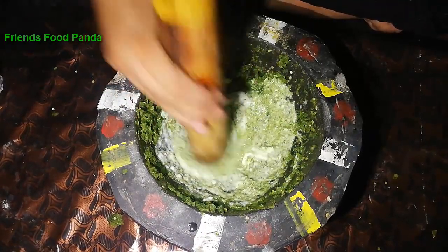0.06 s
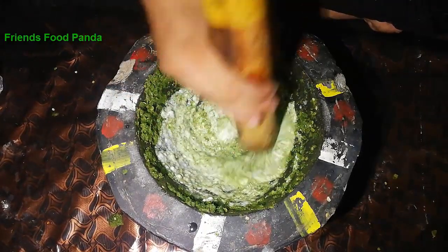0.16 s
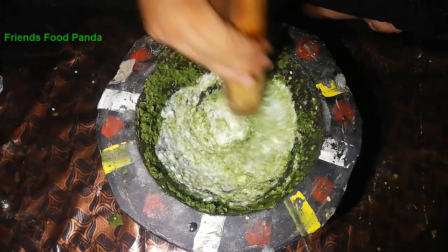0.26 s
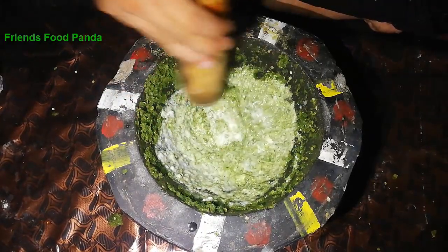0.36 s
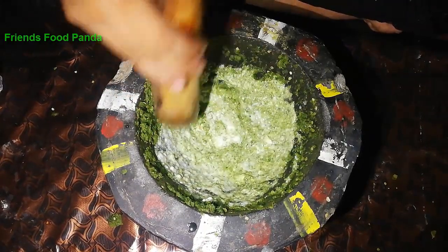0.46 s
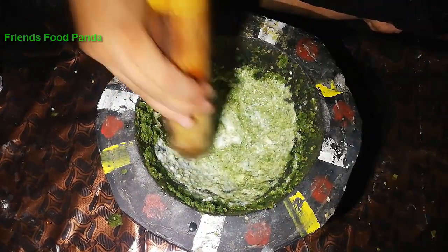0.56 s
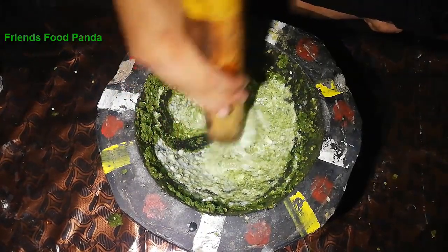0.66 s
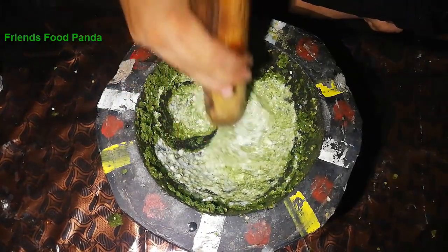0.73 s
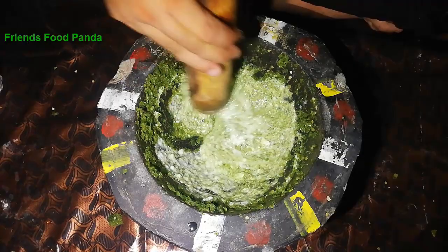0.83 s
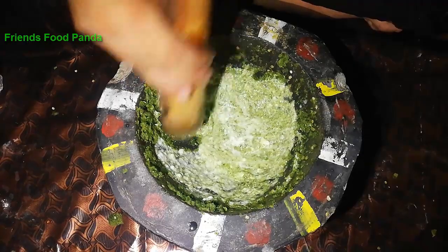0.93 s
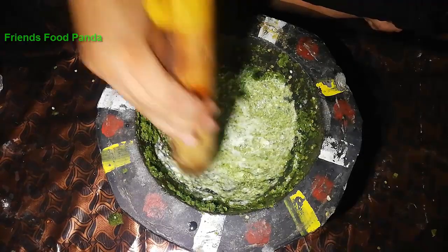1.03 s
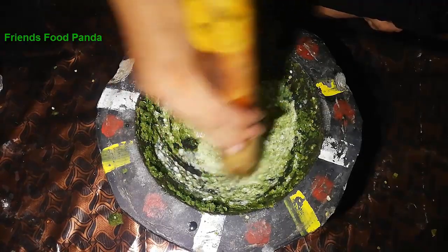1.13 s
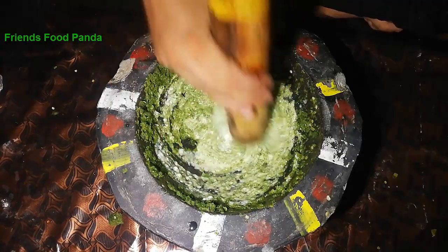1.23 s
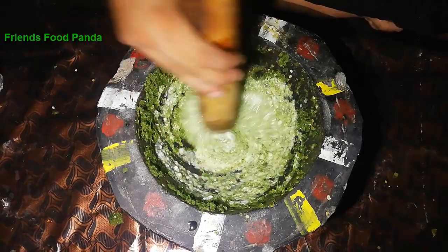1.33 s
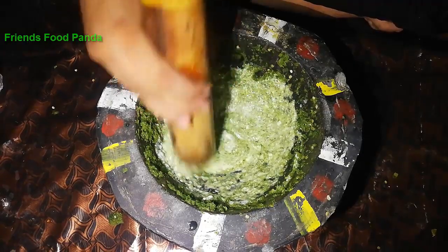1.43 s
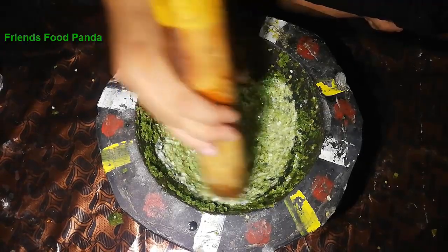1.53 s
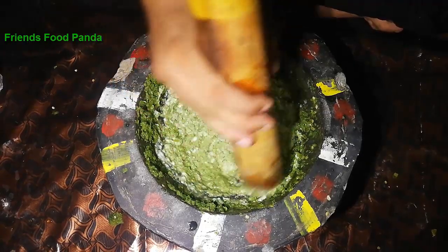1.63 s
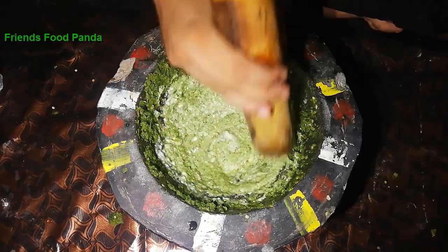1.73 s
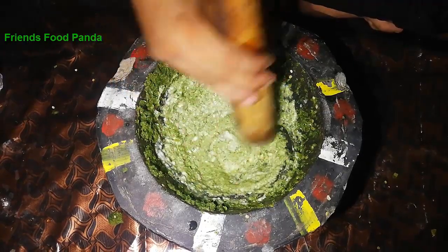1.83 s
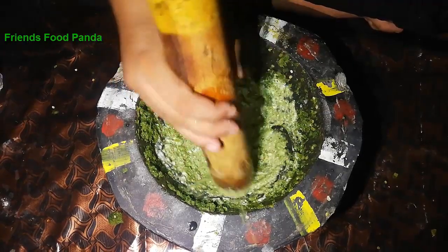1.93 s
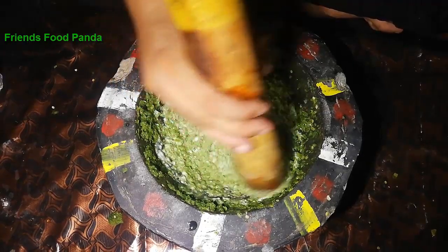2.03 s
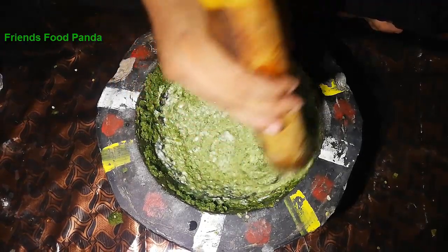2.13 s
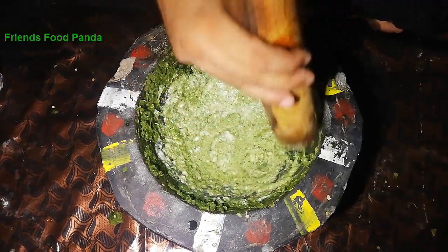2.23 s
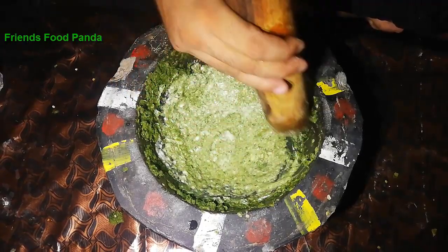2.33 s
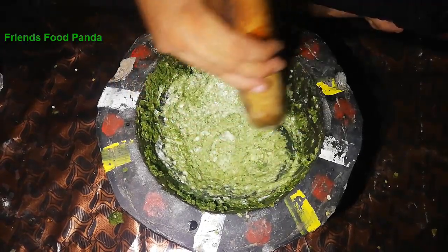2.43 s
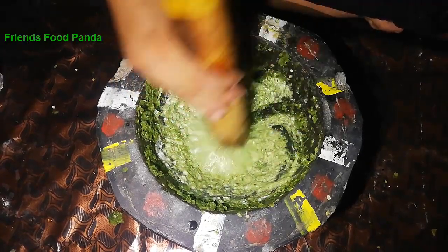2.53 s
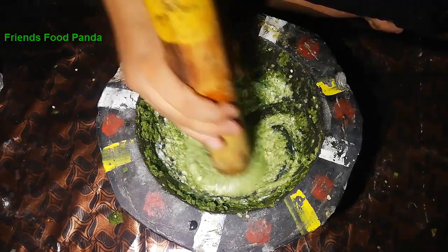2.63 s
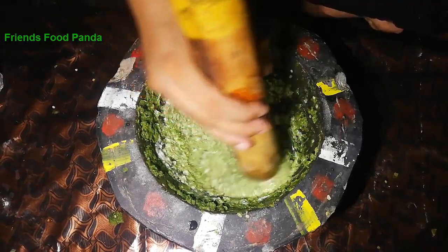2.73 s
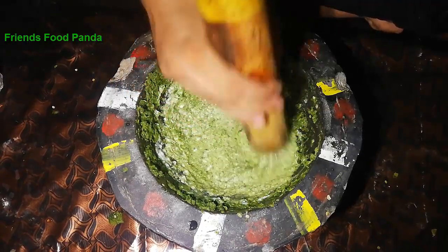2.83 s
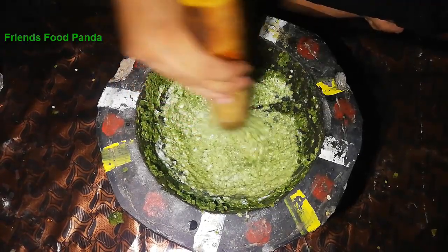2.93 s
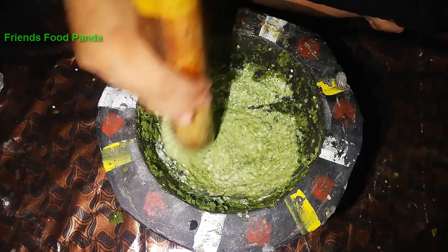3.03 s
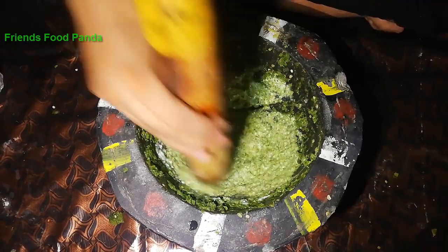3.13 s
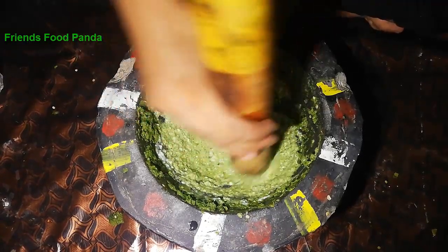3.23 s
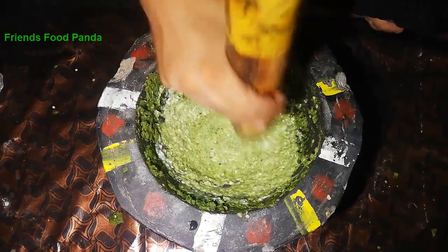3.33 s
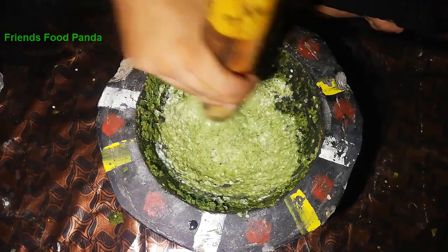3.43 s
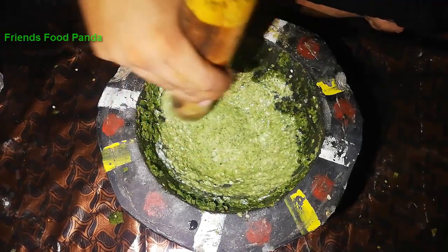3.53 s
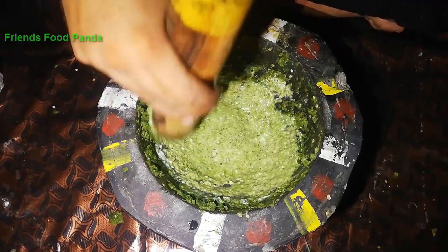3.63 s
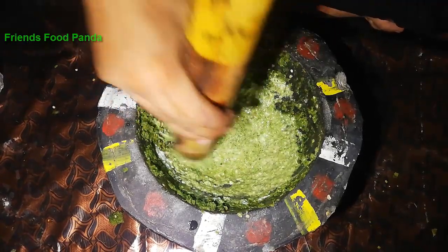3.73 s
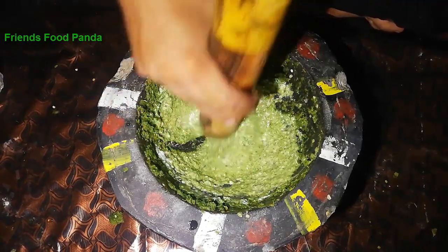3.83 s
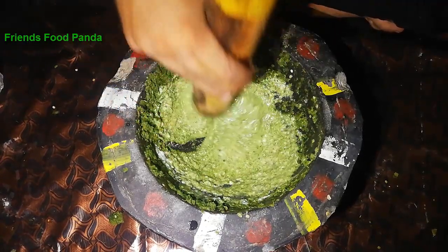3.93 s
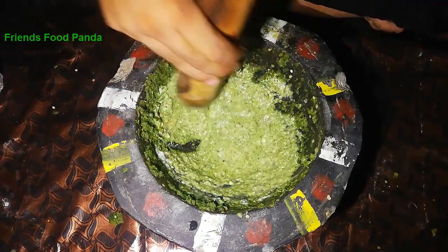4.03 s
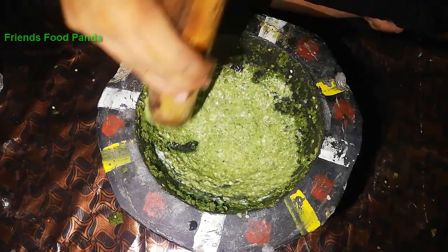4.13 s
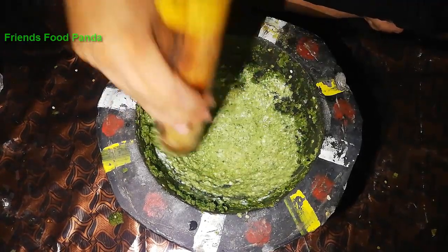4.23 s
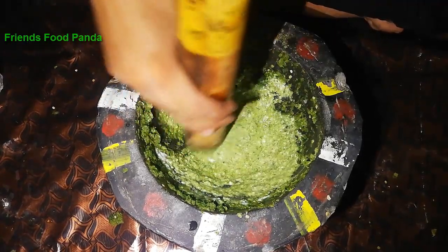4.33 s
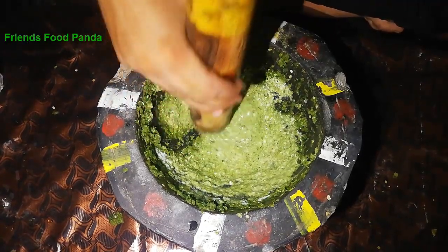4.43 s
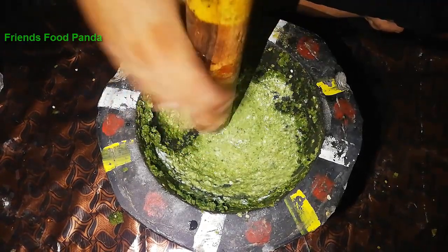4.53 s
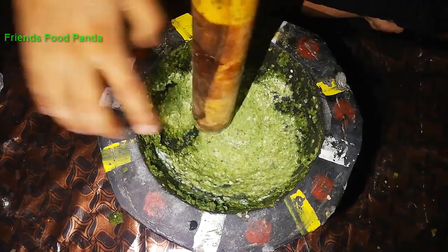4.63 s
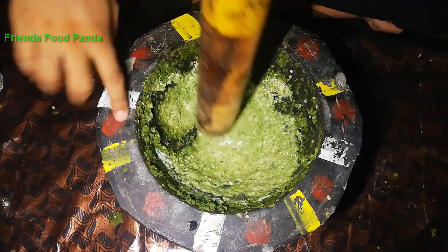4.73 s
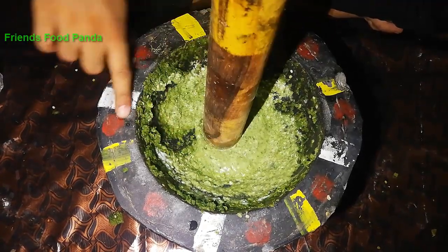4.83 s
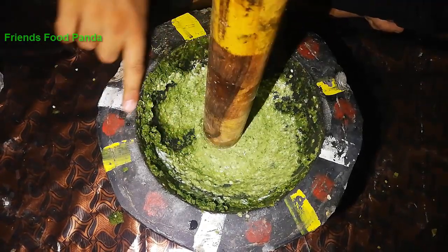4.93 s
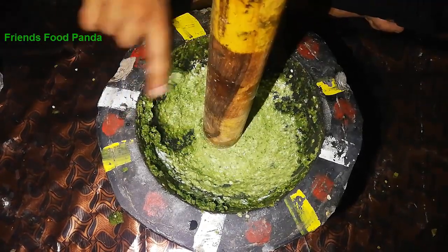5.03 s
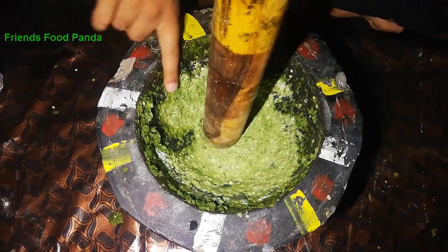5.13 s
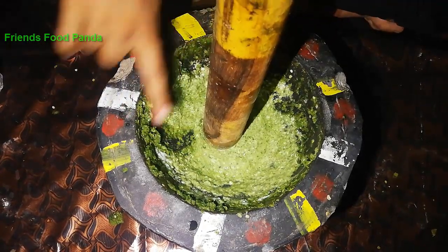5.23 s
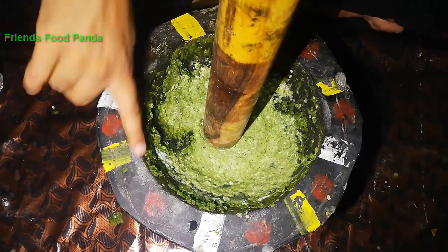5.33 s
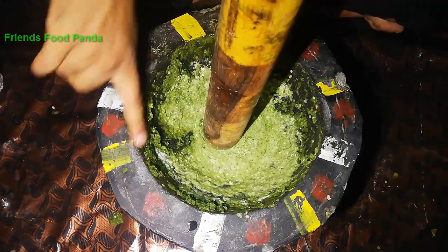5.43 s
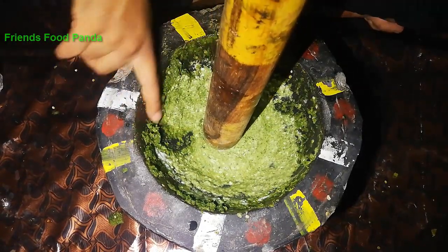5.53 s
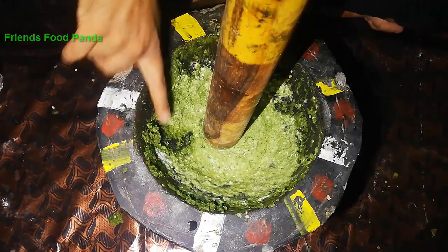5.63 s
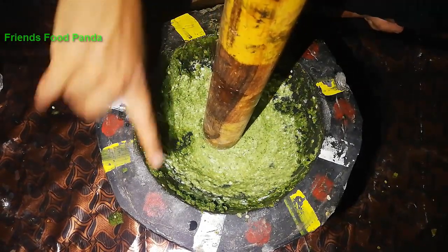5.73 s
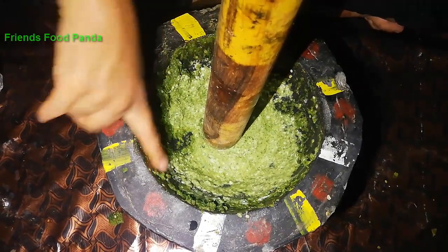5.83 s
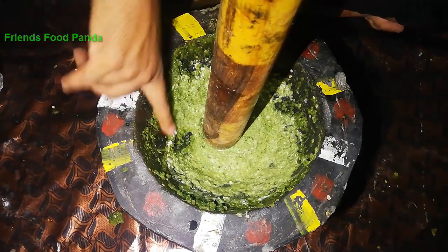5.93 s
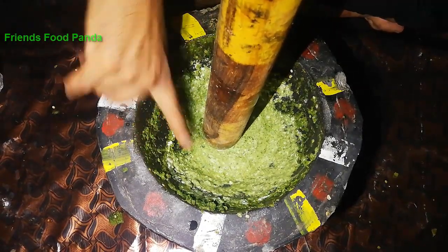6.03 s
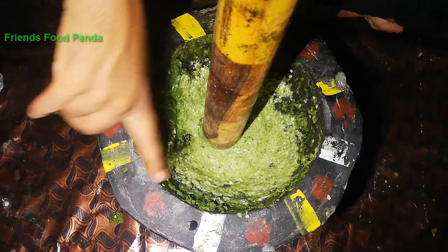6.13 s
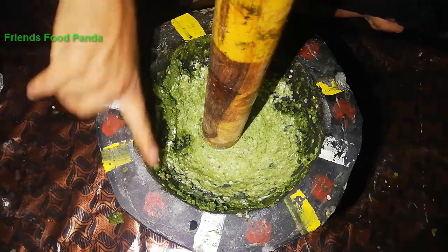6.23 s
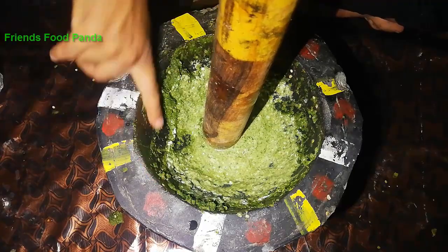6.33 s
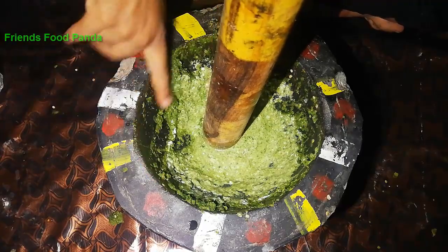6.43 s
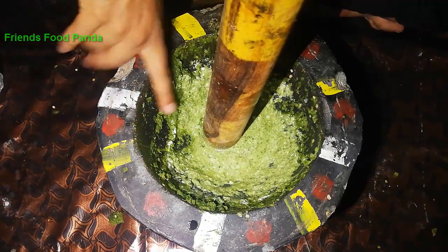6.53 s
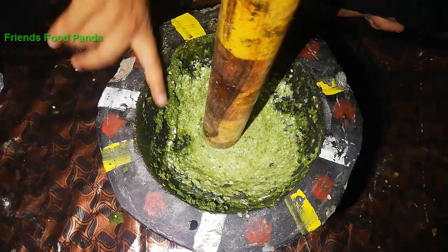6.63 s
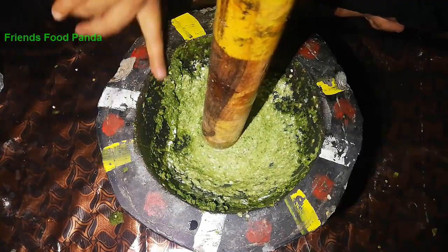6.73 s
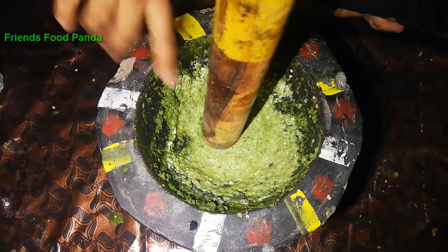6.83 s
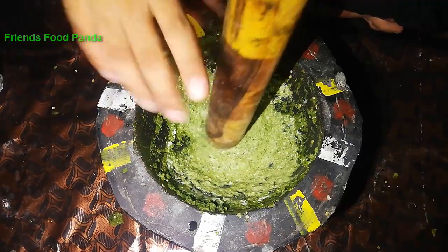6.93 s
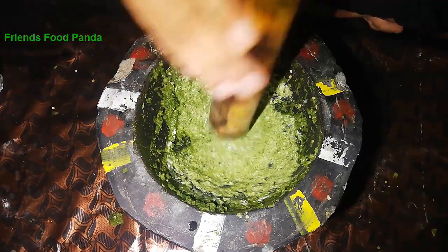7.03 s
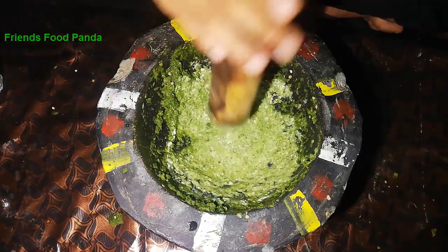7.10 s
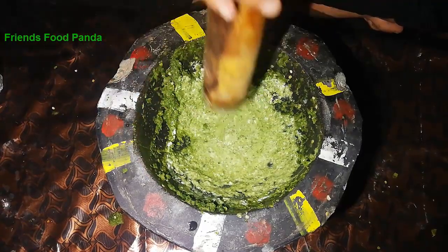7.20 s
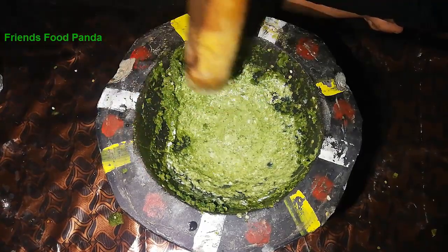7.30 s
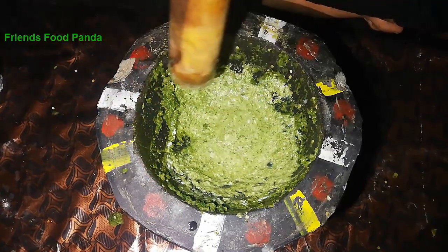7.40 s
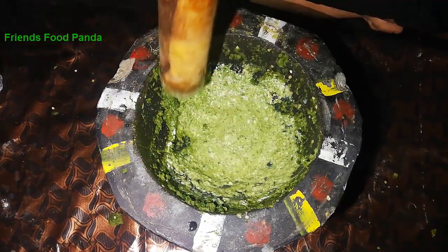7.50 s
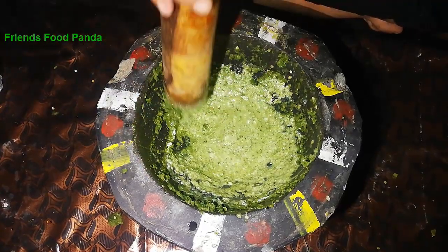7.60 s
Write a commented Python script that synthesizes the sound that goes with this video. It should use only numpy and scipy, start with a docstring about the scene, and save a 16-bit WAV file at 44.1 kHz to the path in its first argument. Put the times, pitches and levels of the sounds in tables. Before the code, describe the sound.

Fast, uneven grinding strokes swing around a heavy bowl, woody and stony, with moist clicks and dull thuds as the pestle hits the wall. After nearly five seconds it falls quiet, leaving small wet smacks and soft rubbing from a finger, then one modest knock. Close stereo microphone, brighter on the right, with short indoor reverberation and faint low rumble.

```python
"""Pestle and mortar on a kitchen floor

A wooden pestle grinds wet herb paste round a heavy mortar and now and then knocks the wall; then a finger
wipes the paste down from the rim in short strokes, and the pestle is set down once more.
Random slips drive the resonances of mortar, bowl, wall and pestle; jolts add pulses, echoes and ringing.
Sheared paste is grainy noise that clicks and bursts where it lets go. A low rumble, a faint whirr and
reverberation fill the room; the right microphone port is brighter and rings near 10 kHz."""
import sys
import numpy as np
from scipy import signal
from scipy.io import wavfile
from scipy.ndimage import uniform_filter1d, map_coordinates

SR = 44100
rng = np.random.default_rng(int(sys.argv[2]) if len(sys.argv) > 2 else 0)


def master(y):
    """Save y as 16-bit WAV."""
    cut = np.clip(np.atleast_2d(y).T, -1, 1)
    pcm = np.round(cut * 32767)  # scale
    wavfile.write(sys.argv[1], SR, pcm.astype(np.int16))


def undo_db(level):
    """Turn decibels back into plain size, where 20 dB means ten times bigger."""
    steps = np.asarray(level, float) / 20
    return 10 ** steps


N = 337806

# Steady room noise. Each row: frequency in Hz, relative density in dB per Hz.
ROOM_SPECTRUM = [(30, -22), (110, -10.5), (190, -8.5), (364, -10), (589, -17.5), (646, -13.5), (683, -12),
                 (1050, -14.5), (3370, -18.5), (14600, -27.5), (16000, -44)]
# Its stereo balance. Each row: frequency in Hz, left minus right in dB.
ROOM_BALANCE = [(60, 0), (300, 0), (1300, 0), (2400, -3), (8000, -2), (15000, 0)]
# Its stereo likeness. Each row: frequency in Hz, left-right correlation from -1 to 1.
ROOM_LIKENESS = [(60, .99), (130, .97), (290, .5), (640, .1), (15000, 0)]
ROOM_DB = -72
# A faint steady whirr far off. Each row: frequency in Hz, width of each of two resonators in Hz, level in dB.
WHIRR = [(6530, 300, -84)]

# Distant rumble. Each row: time in seconds, level in dB.
RUMBLE_LEVEL = [(0.0, -54.5), (1.23, -59), (1.54, -67.5), (2.62, -57), (2.92, -63), (3.127, -53),
                (4.2, -62.5), (4.59, -56.5), (5.29, -63.5), (5.72, -59), (6.31, -62), (7.66, -63.5)]
# Resonances where the room booms. Each row: frequency in Hz, width in Hz, relative level in dB.
RUMBLE_MODES = [(81.7, 26, -1), (125.6, 19, 0.5)]
DRONE_HZ, DRONE_WIDTH_HZ, DRONE_DB = 24, 10, -73   # a steady deep drone

# Mortar rocking on the floor. Each row: frequency in Hz, width in Hz, relative left and right levels in dB.
ROCKING_MODES = [(114, 37, -2.5, -1), (191, 36, 3, 4), (262, 28, 10, 6.5), (382, 24, -6, 2),
                 (393, 14.4, -3.5, -5.5), (467, 16, 4, -9), (515, 70, -8, -4), (620, 100, -4, -0.5),
                 (633, 131, -1, -5), (720, 92, -16.5, -18)]
# Bowl. Each row: frequency in Hz, width in Hz, relative left and right levels in dB.
BOWL_MODES = [(1040, 40, -12.5, -18), (1097, 182, -1, -8), (1136, 28, -0.5, 2.5), (1264, 83, 8.5, 8),
              (1323, 36, 4, -5), (1360, 590, -11, -6)]
# Pestle, ringing lengthwise about 1130 Hz apart.
# Each row: frequency in Hz, width in Hz, relative left and right levels in dB.
PESTLE_MODES = [(2208, 98, -10.5, 0.5), (2242, 43, -6.5, 2), (2332, 25, -7, -2.5),
                (2560, 780, -23.5, -20.5), (3348, 53, -5, 1.5), (3407, 250, -25, -5.5),
                (3736, 200, -32.5, -14), (4640, 120, -12, -7.5), (4420, 65, -19, -13),
                (5880, 29, -16.5, -13), (7050, 34, -25, -10)]
# Thin rings of the mortar wall. Each row: frequency in Hz, width in Hz, relative left and right levels in dB.
WALL_MODES = [(1554, 15, -4, 4.5), (3170, 32, -8, -1.5), (5660, 11, -13.5, -15.5)]
RIM_HZ = 2400   # the upper wall rings lie above
# Wet wood squeaking on stone. Each row: frequency in Hz, width in Hz, relative left and right levels in dB.
SQUEAK_MODES = [(2434, 66, -11, 0.5), (2450, 79, -24, -14.5)]
# The bowl's note moves with the contact point. Each row: time in seconds, contact pitch in Hz.
BOWL_PITCH = [(0.0, 1224), (0.34, 1266), (0.38, 1206), (0.56, 1293), (0.84, 1179), (1.23, 1328),
              (1.34, 1210), (1.41, 1279), (1.58, 1172), (1.91, 1318), (1.93, 1109), (2.18, 1306),
              (2.52, 1225), (2.93, 1273), (2.98, 1180), (3.11, 1295), (3.34, 1294), (3.46, 1179),
              (3.57, 1267), (3.79, 1271), (3.88, 1365), (3.97, 1249), (4.46, 1306), (4.6, 1199)]
BOWL_FOLLOWS = .6      # exponent: share of that move, in octaves, that the bowl makes
PESTLE_WANDER = .012   # relative pitch wander of the pestle under grip and load
WANDER_DB = 2.5        # spread by which each rubbed mode swells and fades

# Sweeps of the pestle round the bowl. Each row: peak in seconds, fall in seconds, pestle singing in dB,
# bowl scrape over it in dB, weight on the floor over it in dB.
SWEEPS = [(0.01, 0.076, -50.5, 5, 9), (0.207, 0.63, -57, -5.5, 6), (0.357, 0.39, -66, 17, -13.5),
          (0.44, 0.38, -66.5, -25, -2), (0.736, 0.068, -52, 7.5, 11.5), (0.816, 0.12, -58.5, 15.5, -7),
          (1.006, 0.22, -62, 3.5, 5), (1.119, 0.1, -56, 3.5, 4.5), (1.225, 0.08, -50, -1, 4.5),
          (1.405, 0.78, -70.5, 16.5, 20.5), (1.553, 0.2, -52, -20, -30.9), (1.611, 0.045, -57, -2, 15.5),
          (1.804, 0.099, -57.5, -2.5, 9.5), (2.02, 0.048, -60, 8, 25.5), (2.07, 0.06, -61.5, 6, 15),
          (2.129, 0.11, -54.5, -7.5, -3), (2.24, 0.26, -57.5, -3.5, -10), (2.46, 0.26, -61, -2, -12),
          (2.591, 0.13, -56, 2, 2.1), (2.75, 0.077, -55, 3.5, -6.5), (2.97, 0.19, -51, 4.5, 8),
          (3.12, 0.11, -52.5, -11, 1.5), (3.24, 0.22, -50, 3.5, 2.5), (3.31, 0.73, -65.5, 7.5, 12),
          (3.454, 0.11, -51, 6, 5.5), (3.619, 0.22, -56.5, -31, -18), (3.682, 0.078, -53.5, -4.5, -37),
          (3.844, 0.21, -55.5, -1.5, 3), (3.893, 0.053, -49.5, 8, -3), (3.93, 0.04, -55.5, 5.5, -4),
          (3.97, 0.071, -50.5, 2.5, -22), (4.03, 0.019, -59.5, 5, -18), (4.157, 0.072, -66, -0.5, -13),
          (4.341, 1, -62.5, -4, -4.5), (4.421, 0.058, -54.5, 1.5, -0.5), (4.465, 0.061, -55, 7.5, -3.5),
          (4.51, 0.049, -57, 4, -7), (4.61, 0.03, -57.5, 1, -17), (4.845, 0.044, -62, -3.5, -4.5),
          (4.89, 0.028, -54, -4.5, -2), (6.74, 0.1, -68.5, -22, -26), (7.575, 0.046, -72, 14.5, 18.5),
          (7.62, 0.08, -76.5, 8, 17)]
SWEEP_RISE_SHARE = 0.39   # a sweep rises in this share of its fall time
# What each sweep also sets going, in dB over its pestle level (the boom: over its weight).
SWEEP_HISS_DB, SWEEP_WALL_DB, SWEEP_SQUEAK_DB, SWEEP_BOOM_DB = -19.5, -17.5, -19.5, -11
# The pestle is off the stone. Each row: start in seconds, end in seconds.
LIFTS = [(1.871, 1.99), (4.54, 4.82), (4.93, 6.6)]
LIFT_DB, LIFT_S = -14, 0.0091   # drop of the rubbing, and the time it takes
SWELL_DB, SWELL_BEND = 12, 1.4   # a swell is SWELL_DB down after its rise or fall time; roundness of its top
# Near this load in dB the judder moves to the rocking modes above SHUDDER_HZ, which gain SHUDDER_GAIN_DB.
SHUDDER_DB, SHUDDER_HZ, SHUDDER_GAIN_DB = -38, 415, 9.5
# Grit or a finger rubbing straight on the wall. Each row: peak in seconds, rise in seconds, fall in seconds,
# level in dB, upper rings over it in dB.
WALL_RUBS = [(0.0, 0.026, 0.068, -71, 3), (0.43, 0.049, 0.026, -51, 4.5), (0.82, 0.062, .06, -71, 6),
             (1.65, 0.084, 0.031, -54, 2), (1.832, 0.11, 0.019, -63, 7), (2.02, 0.015, 0.035, -40.5, -6),
             (2.25, 0.18, 0.2, -60.5, 4.5), (2.735, 0.014, .06, -65, 12), (3.02, 0.074, 0.057, -54, -5),
             (3.91, 0.037, 0.11, -58, 2.5), (4.44, 0.15, 0.047, -60, 1.5), (5.57, 0.051, 0.065, -76, 4),
             (5.98, 0.04, 0.045, -73, 3), (6.345, 0.069, 0.05, -77.5, 13), (6.43, 0.04, 0.04, -87, 10),
             (6.5, 0.04, 0.04, -83.5, 13), (7.57, 0.014, 0.13, -67.5, 2)]
# Wet wood squeaking. Each row: peak in seconds, rise in seconds, fall in seconds, level in dB.
SQUEAKS = [(0.49, 0.061, 0.083, -51), (0.88, 0.091, 0.26, -63), (1.226, 0.011, 0.065, -53),
           (3.0, 0.15, 0.2, -52), (3.36, .12, 0.11, -55), (3.489, 0.09, 0.11, -45),
           (3.68, 0.025, 0.017, -54), (3.9, 0.18, 0.18, -54), (4.19, 0.11, 0.027, -69),
           (4.45, 0.022, 0.079, -49), (4.88, .05, 0.038, -64)]
# Strokes that bring out the pestle's third ring near 3.4 kHz.
# Each row: peak in seconds, rise in seconds, fall in seconds, level in dB.
OVERTONES = [(0.21, 0.041, 0.042, -55), (0.75, .03, 0.068, -56), (1.21, .01, 0.046, -69),
             (1.64, .05, 0.08, -57), (1.81, .02, .04, -61), (2.25, .03, 0.12, -61), (2.75, 0.013, .03, -52),
             (3.83, .02, .04, -56), (3.9, .015, .03, -53), (3.965, .01, .04, -58.5),
             (4.42, 0.055, 0.055, -56.5), (4.885, 0.0099, 0.034, -61), (7.575, .015, .04, -65)]

# Paste sheared by pestle or finger. Each row: peak in seconds, rise in seconds, fall in seconds,
# hiss level in dB, extra body near 4 kHz in dB.
SHEARS = [(0.004, 0.264, 0.088, -59.5, 9.5), (0.196, 0.052, 0.073, -55, 10), (0.293, 0.083, 0.33, -69, 17),
          (0.409, 0.16, 0.12, -56, 9.5), (0.557, 0.31, 0.13, -63, -11), (0.732, 0.097, 0.075, -59, 8.5),
          (0.867, 0.11, 0.078, -65.5, 12), (1.023, 0.12, 0.14, -62.5, 6), (1.152, 0.047, 0.057, -57.5, 6.5),
          (1.2, 0.014, 0.069, -57, 9), (1.497, 0.29, 0.086, -64.5, 11.5), (1.597, 0.069, 0.11, -57, 9.5),
          (1.852, 0.12, 0.045, -61.5, 5.5), (1.993, 0.0042, 0.052, -45, 7.5),
          (2.084, 0.057, 0.13, -60, 8.5), (2.23, 0.0093, 0.064, -54.5, -11), (2.38, 0.36, 0.17, -62, 5),
          (2.481, 0.13, 0.4, -61.5, 6), (2.579, 0.11, 0.13, -59, -2), (2.745, 0.027, 0.017, -54, 9),
          (2.967, 0.096, 0.058, -53, 10), (3.051, 0.031, 0.038, -51.5, 10), (3.107, 0.02, 0.1, -56.5, 11),
          (3.272, 0.19, 0.17, -62, -6), (3.386, 0.059, 0.16, -56, 10.5), (3.571, 0.25, 0.23, -62.5, 5),
          (3.684, 0.03, 0.12, -63.5, 7), (3.798, 0.041, 0.11, -61.5, -10), (3.849, 0.03, 0.087, -55, -9),
          (4.262, 0.34, 0.25, -66, 8), (4.433, 0.12, 0.048, -55, 3), (4.564, 0.042, 0.012, -73, -2),
          (4.613, 0.073, 0.037, -66, 6), (4.873, 0.06, 0.074, -69.5, -0.5), (5.106, 0.011, 0.011, -53, 1.5),
          (5.13, 0.053, 0.038, -58, 4.5), (5.191, 0.023, 0.058, -64, -16),
          (5.561, 0.03, 0.056, -60.5, -1.5), (5.68, 0.06, 0.053, -65.5, 2), (5.942, 0.068, 0.022, -66.5, 0),
          (5.98, 0.051, 0.06, -63, 4.5), (6.057, 0.028, 0.06, -70.5, -7.5),
          (6.355, 0.051, 0.067, -61.5, 1.5), (6.479, 0.071, 0.085, -66, 2.5),
          (6.543, 0.016, 0.049, -66, 7.5), (6.776, 0.049, 0.077, -59.5, 2.5),
          (6.848, 0.088, 0.054, -55.5, 10.5), (7.15, 0.051, 0.14, -78.5, 6), (7.341, 0.018, 0.012, -81, -3),
          (7.558, 0.0096, 0.039, -61, 10), (7.608, 0.021, 0.14, -72.5, 6)]
SHEAR_WALL_DB, SHEAR_PESTLE_DB, SHEAR_BOWL_DB = -22, -15, -18.5   # rings set going, over the hiss
# Paste hiss. Each row: frequency in Hz, relative density in dB per Hz.
HISS_SPECTRUM = [(590, -45.5), (1000, -16), (1320, -7.5), (1790, -5.5), (2250, -13), (2870, -4), (4620, -3),
                 (5900, 0), (9940, 1.5), (13500, -10), (16000, -17.5)]
# Its stereo balance. Each row: frequency in Hz, left minus right in dB.
HISS_BALANCE = [(1000, -16.5), (3000, -5.5), (6000, -3.5), (10000, -14.5), (16000, -11)]
CRACKLE_LOAD_DB = -61   # above this rubbing level the paste also crackles
# Wet paste letting go. Each row: start in seconds, nominal peak in dB.
SMACKS = [(0.194, -38), (1.031, -43), (1.2014, -43), (1.4843, -41), (1.631, -33), (1.992, -38),
          (1.995, -36), (2.376, -54), (2.382, -52), (2.455, -46), (2.461, -39), (2.512, -38), (2.551, -42),
          (2.588, -37), (2.617, -52), (2.7295, -39.5), (2.8605, -44), (2.9412, -39), (3.0355, -45),
          (3.116, -34), (3.787, -40), (3.8052, -38), (3.847, -39), (4.244, -42.5), (4.2976, -41),
          (4.3929, -43), (4.5545, -39.5), (5.1024, -38), (5.104, -34.5), (5.107, -34), (5.111, -37.5),
          (5.15, -40), (5.156, -47), (5.1882, -34.5), (5.202, -45.5), (5.673, -43), (5.689, -50),
          (5.9792, -43), (6.0553, -45.5), (6.0658, -42), (6.4738, -42), (6.5053, -45), (6.5436, -41.5),
          (7.555, -53.5)]
SMACK_T60_S = 0.0075
SMACK_AIR_HZ, SMACK_BODY_DB = 8500, -7   # low edge of its bright part; level of its full-band part
# The click that opens a smack: level over the nominal peak, left level over right, low edge.
SNAP_DB, SNAP_LEFT_DB, SNAP_LOW_HZ = 0.5, -11.5, 2000

# Pestle against the wall. Each row: start in seconds, then nominal levels in dB of jolt, rocking, bowl, pestle.
KNOCKS = [(0.024, -59, -45, -34, -53), (0.033, -46, -32, -56, -60), (0.06, -50, -26, -58, -68),
          (0.163, -35, -65, -48, -65), (0.183, -59, -34, -62, -64), (0.194, -30, -61, -32.5, -49),
          (0.206, -47, -44, -57, -57), (0.243, -63, -39, -39, -60), (0.288, -51, -32.5, -53, -63),
          (0.351, -36, -29, -33, -57), (0.554, -59, -46, -60, -67), (0.719, -29.5, -27, -54, -66),
          (0.96, -57, -44, -67, -68), (1.014, -53, -34.5, -59, -52), (1.099, -57, -41, -47, -48),
          (1.163, -47, -27.5, -58, -51), (1.184, -32.5, -23.5, -56, -59), (1.2, -46, -50, -30, -29),
          (1.213, -55, -50, -50, -32.5), (1.282, -43, -31.5, -52, -44), (1.361, -31, -35, -48, -49),
          (1.421, -24.5, -34.5, -43, -60), (1.463, -42, -34, -51, -61), (1.503, -52, -34, -37, -49),
          (1.595, -29, -29.5, -49, -46), (1.613, -41, -35, -58, -60), (1.625, -54, -40.5, -58, -60),
          (1.668, -33, -32.5, -65, -63), (1.797, -34, -38, -57, -59.5), (1.834, -49, -37, -68, -53),
          (1.9945, -5.5, -27, -22, -38.5), (2.579, -42, -40.5, -62, -63), (2.7295, -42.5, -71, -29.5, -38),
          (2.889, -48, -29, -59, -50), (2.903, -36, -32, -52, -54), (2.913, -39, -26, -59, -49),
          (2.943, -48, -43, -43, -55), (2.989, -22, -30, -58, -53), (3.071, -45, -27.5, -53, -63),
          (3.218, -41, -26, -45, -57), (3.287, -31, -29, -45, -39.5), (3.296, -35, -31, -45, -48),
          (3.32, -46, -36, -55, -60), (3.343, -38, -30, -51, -63), (3.357, -38, -32, -44, -47),
          (3.408, -57, -51, -34, -43), (3.44, -21, -32.5, -50, -58), (3.474, -36, -39, -51, -47),
          (3.52, -43, -32, -37, -53), (3.581, -46, -37, -71, -73), (3.827, -53, -44, -62, -64),
          (3.874, -35, -36, -37, -36), (4.41, -41, -71, -57, -43), (4.609, -56.5, -61, -60, -68),
          (4.847, -63, -59, -51, -56), (4.877, -45.5, -58, -52, -48), (7.5544, -27.5, -34, -33, -51),
          (7.594, -55, -46, -58, -66), (7.617, -55, -42, -60, -66)]
# Direct sound, then first echoes off bowl and floor. Each row: delay in seconds, left gain, right gain.
ECHOES = [(0, 1.0, .55), (.0018, .3, .5), (.0027, .4, .5), (.0062, .15, .2), (.0098, .15, .1)]
# Bare tip on stone, only the pestle's upper rings. Each row: start in seconds, nominal peak in dB.
TAPS = [(0.163, -50), (2.617, -50), (2.7285, -24), (3.897, -49), (4.879, -47)]
PASTE_CUSHION_HZ = 1670        # the paste keeps the jolt dull
ROCKING_CONTACT_SHARE = 1.5    # multiple of the contact time that the rocking modes feel
KNOCK_WALL_DB = 1              # wall drive over the nominal pestle level
# Dense shudder of floor and mortar after a jolt.
FLOOR_DB, FLOOR_T60_S = -21.5, 0.32
FLOOR_LOW_HZ, FLOOR_TILT_HZ, FLOOR_TOP_HZ = 297, 850, 1700
FLOOR_SOFT_LOSS = .3   # dB the shudder loses besides, per dB that a jolt is softer than the hardest

KITCHEN_T60_S, WALL_CUT_HZ = 0.39, 1300   # decay before damping; low-pass passed on every round

# Scrapes whose noise band climbs as the tip runs up the wall.
# Each row: peak in seconds, rise in seconds, fall in seconds, level in dB.
CLIMBS = [(0.84, 0.068, 0.13, -58)]
CLIMB_HZ, CLIMB_WIDTH_HZ, CLIMB_OCTAVES_PER_S = 1860, 1000, 4.3

PORT_LAG = 6   # samples by which the right port hears the mortar late
PORT_HZ, PORT_WIDTH_HZ, PORT_DB = 9650, 850, -3   # ring of the right port
TOP_HZ = 15700


def rms_one(x):
    """Normalization: scale to unit root-mean-square."""
    return x / np.sqrt(np.mean(x ** 2) + 1e-20)


def at_hz(points, hz):
    """Interpolation of a spectrum on a logarithmic frequency axis."""
    points = np.array(points)
    return np.interp(np.log(hz), np.log(points[:, 0]), points[:, 1])


def band(x, low_hz, high_hz):
    """Band limitation by a second-order Butterworth band-pass."""
    return signal.sosfilt(signal.butter(2, [low_hz, high_hz], "band", fs=SR, output="sos"), x)


def lowpass(x, order, cut_hz):
    """Treble loss by a Butterworth low-pass."""
    return signal.sosfilt(signal.butter(order, cut_hz, fs=SR, output="sos"), x)


def drift(rate):
    """Slow random modulation: noise through two equal poles, unit spread, computed every 40 samples."""
    r = np.exp(-80 * np.pi * rate / SR)
    slow = signal.lfilter([1], [1, -2 * r, r * r], rng.standard_normal(N // 40 + 2002))[2000:]
    return np.interp(np.arange(N) / 40, np.arange(len(slow)), rms_one(slow))


def grit(per_s, spread_db):
    """Stick-slip friction as random impulses of uneven size and either sign; rms 1."""
    sizes = undo_db(spread_db * np.minimum(rng.exponential(1, N), 5)) * rng.choice([-1, 1], N)
    return rms_one(sizes * (rng.random(N) < per_s / SR))


def resonate(force, hz, width_hz):
    """Damped oscillator: a two-pole resonance with gain 1 at its peak."""
    r = np.exp(-np.pi * width_hz / SR)
    numerator = [(1 - r * r) / 2, 0, (r * r - 1) / 2]
    denominator = [1, -2 * r * np.cos(2 * np.pi * hz / SR), r * r]
    return signal.lfilter(numerator, denominator, force + 1e-18)


def rubbed(modes, per_s, spread_db, wander_db, alike):
    """Frictional modal excitation: slips drive modes that swell as the contact point travels; mid rms 1."""
    shared, own = grit(per_s, spread_db), rng.standard_normal((2, N))
    alike = np.clip(alike, 0, 1)
    force = np.sqrt(alike) * shared + np.sqrt(1 - alike) * own * np.abs(shared)
    force = force / np.std(force)
    out = np.zeros((2, N))
    for k, (hz, width, left_db, right_db) in enumerate(modes):
        gain = undo_db(np.array([[left_db], [right_db]]) + wander_db * drift(5.0))
        out += (-1) ** k * gain * resonate(force, hz, width)
    return out / np.std(out.mean(axis=0))


def glide(x, pitch):
    """Resampling: a sound read faster or slower shifts its resonances with the pitch relative to its mean."""
    at = np.cumsum(pitch / pitch.mean()) - 1
    return np.array([map_coordinates(side, [at], order=3, mode="mirror") for side in x])


def struck(modes, peak_db, contact_s, damping, contact_hz, hits=KNOCKS):
    """Impulsive modal excitation: strengths scatter, and a long contact hardly reaches the high modes."""
    at, out = [round(row[0] * SR) for row in hits], np.zeros((2, N))
    scatter_db = 2.5 * rng.standard_normal((len(at), len(modes)))
    for k, (hz, width, left_db, right_db) in enumerate(modes):
        clicks = np.zeros(N)
        clicks[at] = undo_db(peak_db + scatter_db[:, k]) / (1 + (hz * contact_s) ** 2)
        # level the ring peaks despite the unit gain of each resonance, and share them among the modes
        clicks *= SR / (2 * np.pi * width * damping * np.sqrt(len(modes)))
        gain = undo_db(np.array([[left_db], [right_db]]))
        out += (-1) ** k * gain * resonate(clicks, hz, width * damping)
    return lowpass(out, 2, contact_hz)


def coloured(white, spectrum, balance, likeness, patchy_db):
    """Spectral shaping: narrow noise bands, each with level, balance, likeness and flicker; mid rms 1."""
    out, edges = 0, 20 * 2 ** np.arange(0, 9.8, .4)
    for k, (low, high) in enumerate(zip(edges, edges[1:])):
        hz = np.sqrt(low * high)
        if hz > spectrum[0][0]:
            mid, side = band(white[k % 2], low, high)
            alike = np.clip(at_hz(likeness, hz), -1, 1)
            tilt_db = at_hz(balance, hz) * np.array([[.5], [-.5]])
            gain = undo_db(at_hz(spectrum, hz) + tilt_db + patchy_db * drift(8.6))
            out = out + gain * (np.sqrt(1 + alike) * mid + np.sqrt(1 - alike) * side * [[1], [-1]])
    return out / np.std(out.mean(axis=0))


def together(*levels):
    """Incoherent superposition: unrelated drives add by power."""
    return np.sqrt(sum(level ** 2 for level in levels))


def swells(peak_s, rise_s, fall_s, peak_db):
    """Amplitude envelope: rounded swells superposed by power, computed every 40 samples."""
    t = np.arange(0, N + 40, 40) / SR
    since = t - np.reshape(peak_s, (-1, 1))
    rising = -since / np.maximum(rise_s, .004)[:, None]
    falling = since / np.maximum(fall_s, .004)[:, None]
    u = np.where(since < 0, rising, falling)
    power = np.sum(undo_db(np.reshape(peak_db, (-1, 1)) - SWELL_DB * u ** SWELL_BEND) ** 2, axis=0)
    return np.interp(np.arange(N) / SR, t, np.sqrt(power))


def sweeps():
    """Friction under load: drives of pestle, bowl and floor, which nearly vanish when the pestle is lifted."""
    s, fall_s, rub_db, bowl_db, weight_db = np.transpose(SWEEPS)
    t = np.arange(N) / SR
    lifted = sum(np.clip(np.minimum(t - start, end - t) / LIFT_S, 0, 1) for start, end in LIFTS)
    return [undo_db(LIFT_DB * lifted) * swells(s, SWEEP_RISE_SHARE * fall_s, fall_s, rub_db + over_db)
            for over_db in (0, bowl_db, weight_db)]


def room_tone():
    """Stationary background: partly correlated stereo noise, and noise in a sharp resonance as a whirr."""
    white = rng.standard_normal((2, 2, N))
    tone = undo_db(ROOM_DB) * coloured(white, ROOM_SPECTRUM, ROOM_BALANCE, ROOM_LIKENESS, patchy_db=1.5)
    for hz, width, level_db in WHIRR:
        whirr = resonate(resonate(rng.standard_normal((2, N)), hz, width), hz, width)
        tone += undo_db(level_db) * rms_one(whirr)
    return tone


def rumble():
    """Room resonance: low noise from outside and the loaded floor booms in a few modes, over a deep drone."""
    white = rng.standard_normal(N)
    boom = sum(undo_db(level_db) * rms_one(resonate(white, hz, width)) for hz, width, level_db in RUMBLE_MODES)
    boom = band(band(boom, 58, 160), 58, 160)
    drone = resonate(resonate(white, DRONE_HZ, DRONE_WIDTH_HZ), DRONE_HZ, DRONE_WIDTH_HZ)
    outside = undo_db(np.interp(np.arange(N) / SR, *np.transpose(RUMBLE_LEVEL)))
    floor = undo_db(SWEEP_BOOM_DB) * sweeps()[2]
    return undo_db(DRONE_DB) * rms_one(drone) + together(outside, floor) * rms_one(boom)


def grinding():
    """Friction-driven vibration: the mortar judders on the floor; bowl, wall and pestle sing under the grit."""
    rub, bowl, weight = sweeps()
    shear = swells(*np.transpose(SHEARS)[:4])

    rock = rubbed(ROCKING_MODES, per_s=500, spread_db=1.5, wander_db=WANDER_DB, alike=.8)
    heavy = weight ** 2 / (weight ** 2 + undo_db(SHUDDER_DB) ** 2)
    shudder = undo_db(SHUDDER_GAIN_DB) * band(rock, SHUDDER_HZ, 750)
    judder = weight * ((1 - heavy) * rock + heavy * shudder)

    bowl_hz = np.interp(np.arange(N) / SR, *np.transpose(BOWL_PITCH))
    bowl_ring = rubbed(BOWL_MODES, per_s=1500, spread_db=1.5, wander_db=WANDER_DB, alike=1.0)
    bowl_level = together(bowl, undo_db(SHEAR_BOWL_DB) * shear)
    bowl_song = bowl_level * glide(bowl_ring, bowl_hz ** BOWL_FOLLOWS)

    s, rise_s, fall_s, wall_db, upper_db = np.transpose(WALL_RUBS)
    bed = together(undo_db(SWEEP_WALL_DB) * rub, undo_db(SHEAR_WALL_DB) * shear)
    low = together(swells(s, rise_s, fall_s, wall_db), bed)
    high = together(swells(s, rise_s, fall_s, wall_db + upper_db), bed)
    ring = undo_db(4.5) * rubbed(WALL_MODES, per_s=1100, spread_db=1.0, wander_db=WANDER_DB, alike=0.48)
    wall_song = low * band(ring, 600, RIM_HZ) + high * band(ring, RIM_HZ, 9000)

    third_ring = rubbed(PESTLE_MODES[4:7], per_s=1300, spread_db=0.0, wander_db=WANDER_DB, alike=0.4)
    overtones = swells(*np.transpose(OVERTONES)) * third_ring

    squeak_level = together(swells(*np.transpose(SQUEAKS)), undo_db(SWEEP_SQUEAK_DB) * rub)
    squeak = squeak_level * rubbed(SQUEAK_MODES, per_s=1500, spread_db=2.0, wander_db=WANDER_DB, alike=0.61)

    pestle_ring = rubbed(PESTLE_MODES, per_s=1500, spread_db=1.5, wander_db=WANDER_DB, alike=0.36)
    pestle_level = together(rub, undo_db(SHEAR_PESTLE_DB) * shear)
    pestle_song = pestle_level * glide(pestle_ring, 1 + PESTLE_WANDER * drift(3.0))
    return judder + bowl_song + wall_song + overtones + squeak + pestle_song


def paste():
    """Viscous shear and sudden release: granular hiss, with a click and a bright decaying burst at each release."""
    peak_s, rise_s, fall_s, hiss_db, body_db = np.transpose(SHEARS)
    rub = sweeps()[0]
    bed = undo_db(SWEEP_HISS_DB) * rub + 1e-9
    level = together(swells(peak_s, rise_s, fall_s, hiss_db), bed)
    body_level = together(swells(peak_s, rise_s, fall_s, hiss_db + body_db), bed)

    smack, snap, t = np.zeros(N), np.zeros(N), np.arange(SR // 4) / SR
    for s, peak_db in SMACKS:
        tail = smack[round(s * SR):][:len(t)]   # a view: adding to it adds to smack
        burst = undo_db(peak_db - 6 - 60 * t / SMACK_T60_S) * np.minimum(t / .0003, 1)
        tail += burst[:len(tail)]
        snap[round(s * SR)] = undo_db(peak_db + SNAP_DB)

    load = rub / together(rub, undo_db(CRACKLE_LOAD_DB))
    crackle = load * uniform_filter1d(np.abs(grit(150, spread_db=-1.0)), size=9)
    grains = 0.51 + 0.46 * np.abs(grit(2500, spread_db=0.0)) + 0.15 * crackle
    white = grains * rng.standard_normal((2, 2, N))
    likeness = [(1000, 0.58), (16000, 0.078)]   # Hz, left-right correlation
    hiss = coloured(white, HISS_SPECTRUM, HISS_BALANCE, likeness, patchy_db=1.8)
    hiss = hiss / np.std(band(hiss.mean(axis=0), 6000, 14000))   # levels refer to the treble

    body = (body_level - level) * band(hiss, 2000, 5300)
    bursts = smack * (undo_db(SMACK_BODY_DB) * hiss + band(hiss, SMACK_AIR_HZ, 19000))
    clicks = undo_db([[SNAP_LEFT_DB], [0]]) * band(snap, SNAP_LOW_HZ, 15000)
    return level * hiss + body + bursts + clicks


def knocks():
    """Impact radiation: a pressure pulse as long as the contact, its echoes, floor shudder and ringing bodies."""
    s, jolt_db, thud_db, bowl_db, crack_db = np.transpose(KNOCKS)
    contact_s = .0014 * undo_db(-.22 * (jolt_db + 12))      # the harder the blow, the shorter the contact
    pulse, t = np.zeros(N), np.arange(SR // 50) / SR
    for start, peak_db, length in zip(s, jolt_db, contact_s):
        u = (t - length / 2) * 6 / length      # a bell-shaped push radiates its second derivative
        push = undo_db(peak_db - 2) * (1 - u * u) * np.exp(-u * u / 2)
        piece = pulse[round(start * SR):][:len(t)]   # a view: adding to it adds to pulse
        piece += push[:len(piece)]
    pulse = lowpass(pulse, 4, PASTE_CUSHION_HZ)
    direct = sum(np.array([[left], [right]]) * np.roll(pulse, round(lag * SR)) for lag, left, right in ECHOES)

    rocking_s = ROCKING_CONTACT_SHARE * contact_s
    tap_db = np.transpose(TAPS)[1]
    rings = (struck(ROCKING_MODES, thud_db + 3, rocking_s, damping=1.4, contact_hz=1000)
             + struck(BOWL_MODES, bowl_db, 0, damping=1.6, contact_hz=1600)
             + struck(WALL_MODES, crack_db + KNOCK_WALL_DB, 0, damping=3.3, contact_hz=3093)
             + struck(PESTLE_MODES, crack_db + 8.0, 0, damping=0.84, contact_hz=5160)
             + struck(PESTLE_MODES[4:], tap_db + 9, 0, damping=2.2, contact_hz=4600, hits=TAPS))
    rings = np.roll(rings, round(.0005 * SR), axis=1)   # the ring starts once the paste is squeezed out

    jolts = np.zeros(N)
    soft_loss_db = FLOOR_SOFT_LOSS * (jolt_db - jolt_db.max())
    jolts[((s + .004) * SR).astype(int)] = undo_db(jolt_db + FLOOR_DB + soft_loss_db)
    dying = signal.lfilter([1], [1, -undo_db(-60 / (FLOOR_T60_S * SR))], jolts)
    shared, left, right = rng.standard_normal((3, N))
    dense = lowpass(shared + 0.6 * np.array([left, right]), 8, FLOOR_TOP_HZ)
    tilt = signal.butter(1, [FLOOR_LOW_HZ, FLOOR_TILT_HZ], "band", fs=SR, output="sos")
    return direct + dying * rms_one(signal.sosfilt(tilt, dense)) + rings


def kitchen(x):
    """Reverberation: eight feedback delays a side, duller on every round."""
    out, dull = np.zeros((2, N)), np.exp(-2 * np.pi * WALL_CUT_HZ / SR)
    for k, lag in enumerate((np.geomspace(.009, .037, 16) * SR).astype(int)):
        loop, gain, state = x.copy(), undo_db(-60 * lag / SR / KITCHEN_T60_S), [0.]
        for i in range(lag, N, lag):
            back, state = signal.lfilter([gain * (1 - dull)], [1, -dull], loop[i - lag:i], zi=state)
            loop[i:i + lag] += back[:N - i]
        out[k % 2] += (loop - x) * (-1) ** (k // 2)
    return out


def climbs():
    """Rising resonance: gritty noise through a doubled resonator glides upward during each scrape."""
    out = np.zeros(N)
    for row in CLIMBS:
        octaves = CLIMB_OCTAVES_PER_S * (np.arange(N) / SR - row[0])
        pitch = 2 ** np.clip(octaves, -.5, .5)
        pitch[-N // 2:] = 2 - pitch[:-N // 2].mean()      # silent by then; keeps the mean pitch at 1
        noise = grit(2000, spread_db=5.0)
        for _ in range(2):
            noise = resonate(noise, CLIMB_HZ, CLIMB_WIDTH_HZ)
        out += swells(*np.transpose([row])) * glide([rms_one(noise)], pitch)[0]
    return out


def scene():
    """Superposition of the mortar at two ports, its reverberation, the room tone and the rumble."""
    blows, near = knocks(), grinding() + climbs() + paste()
    wet = kitchen(undo_db(-19.5) * blows.mean(axis=0) + undo_db(-16.5) * near.mean(axis=0))
    mortar = blows + near
    port_ring = undo_db(PORT_DB) * resonate(mortar[1], PORT_HZ, PORT_WIDTH_HZ)
    mortar[1] = np.roll(mortar[1] + port_ring, PORT_LAG)
    return mortar + wet + room_tone() + rumble()


def roll_off(x):
    """The treble ends steeply here."""
    return signal.sosfilt(signal.butter(12, 16510, fs=SR, output="sos"), x)


def record(dry):
    """Pressure pickup at close ports: long waves reach both alike, and the top is rolled off."""
    dry = lowpass(dry, 6, TOP_HZ)
    highpass = signal.butter(1, 300, "high", fs=SR, output="sos")
    side = signal.sosfilt(highpass, (dry[0] - dry[1]) / 2)
    mix = dry.mean(axis=0) + side * [[1], [-1]]
    return roll_off(mix)


dry = scene()
out = record(dry)
master(out)
```